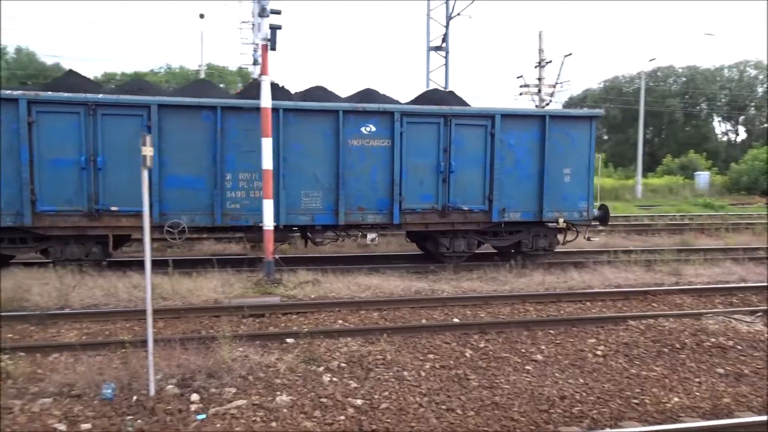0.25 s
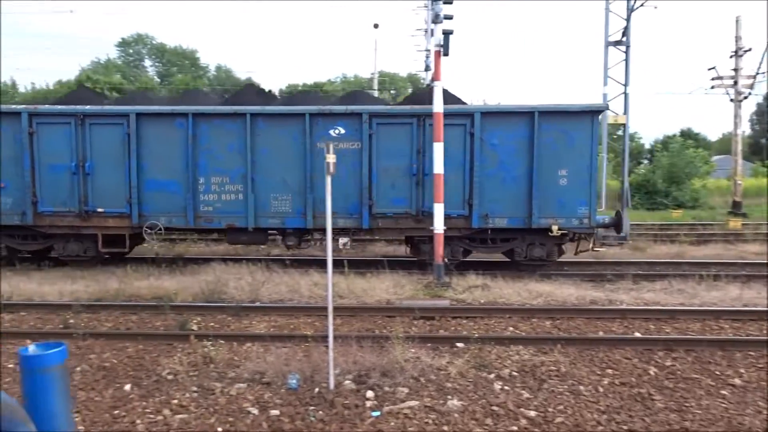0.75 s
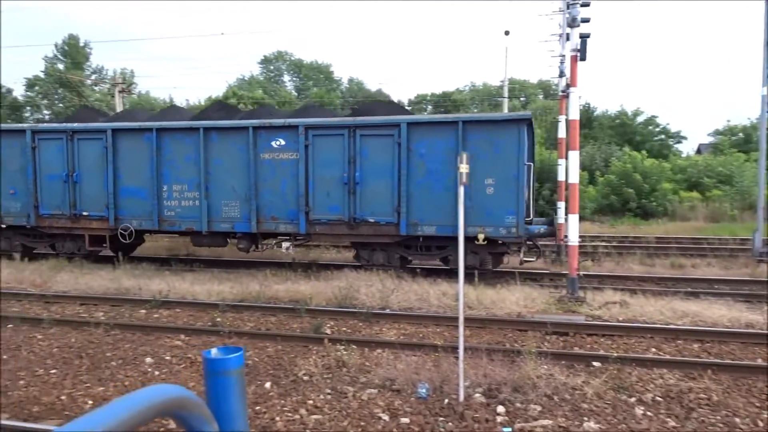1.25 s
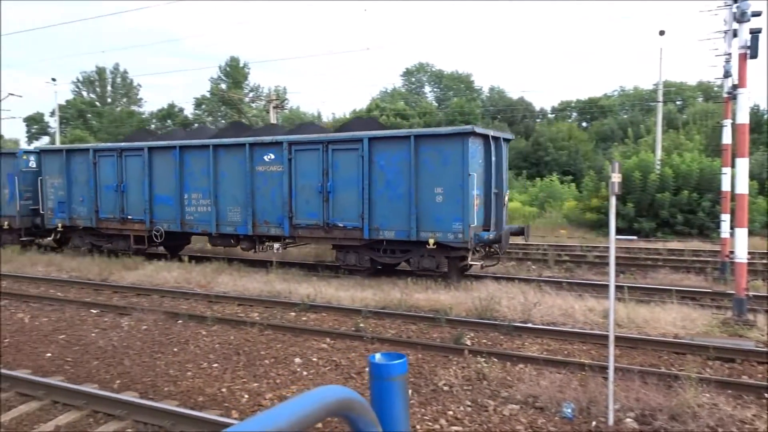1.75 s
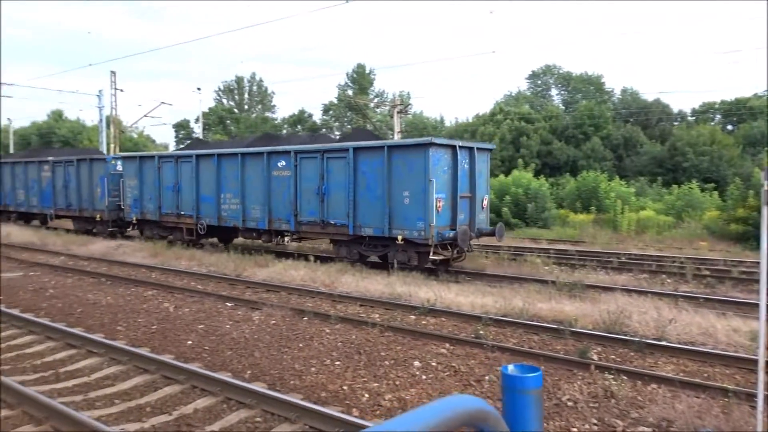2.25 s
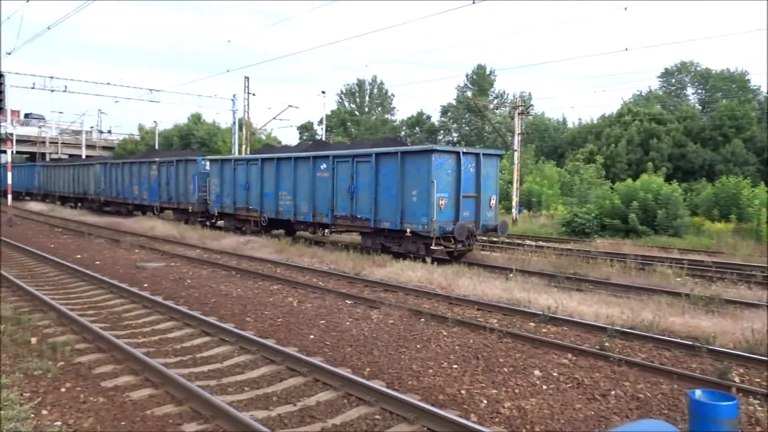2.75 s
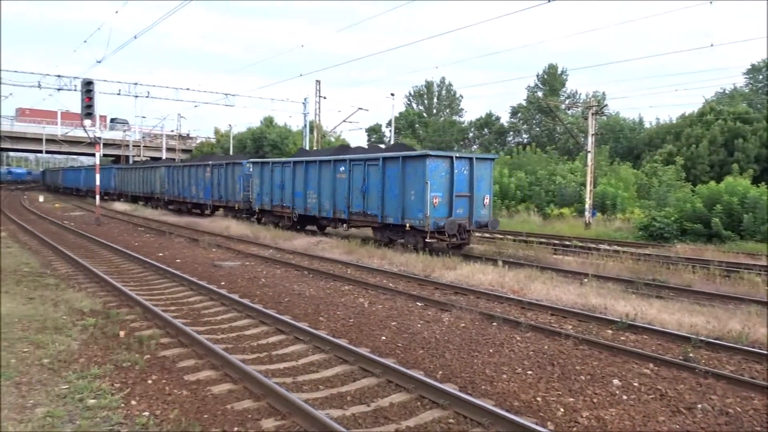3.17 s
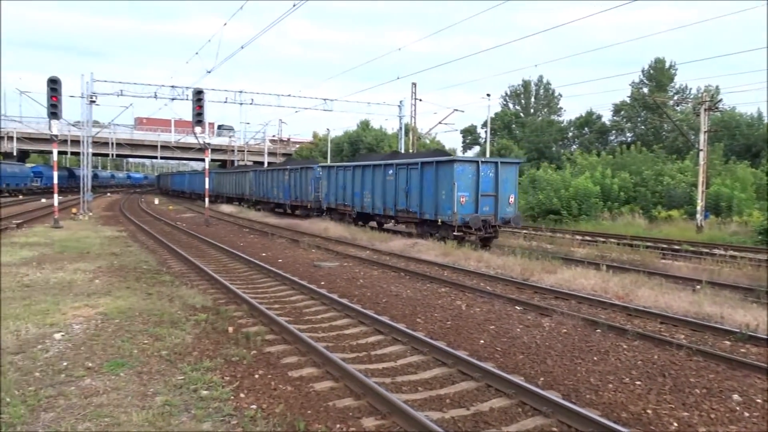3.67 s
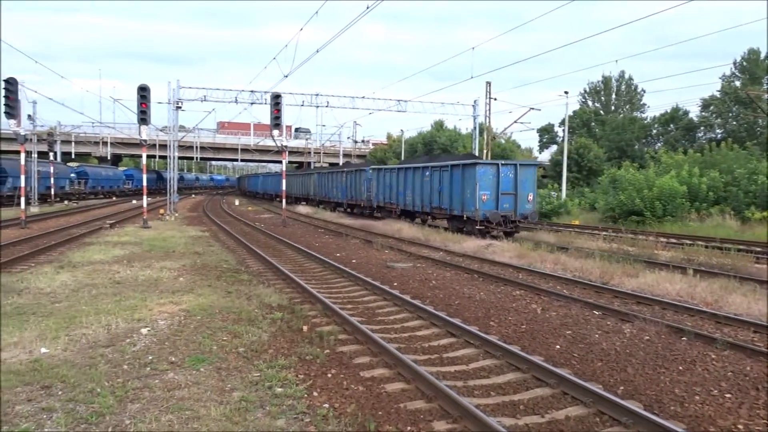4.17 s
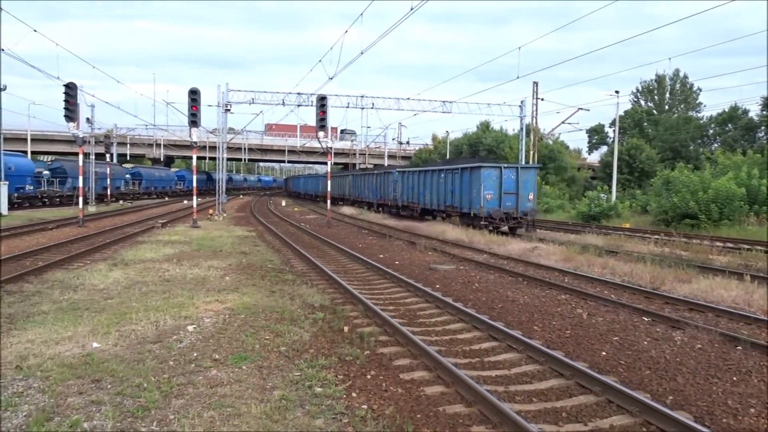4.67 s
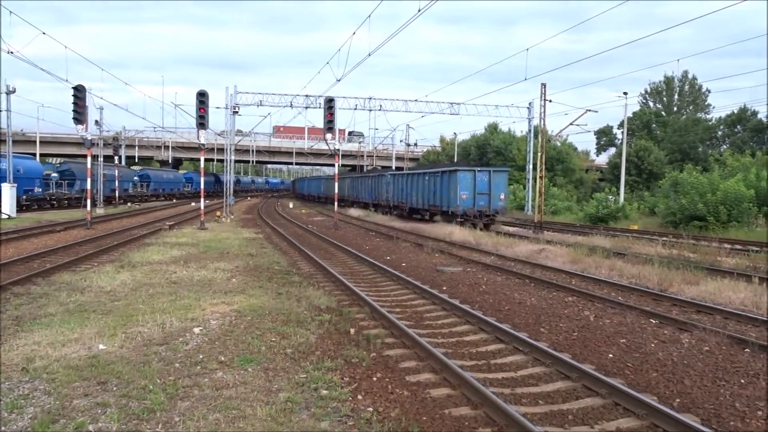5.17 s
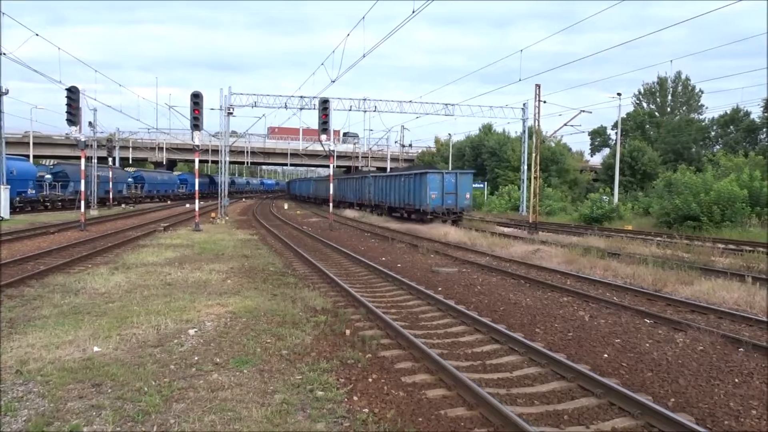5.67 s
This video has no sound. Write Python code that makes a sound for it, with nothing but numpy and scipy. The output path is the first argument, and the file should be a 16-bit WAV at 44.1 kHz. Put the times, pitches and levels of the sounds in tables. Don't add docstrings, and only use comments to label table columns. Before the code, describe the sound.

Loaded steel freight wagons roar and clatter over rail joints in an open yard, knocking and ticking, then recede and thin out.

```python
import sys
import numpy as np
from scipy import signal
from scipy.io import wavfile
from scipy.ndimage import map_coordinates

SR = 44100
rng = np.random.default_rng(int(sys.argv[2]) if len(sys.argv) > 2 else 0)


def boost(x):
    u = np.asarray(x, float) / 20
    return 10 ** u


def master_out(mix):
    frames = np.transpose(np.atleast_2d(mix))
    ceiling = np.clip(frames, -1, 1)
    pcm = np.round(ceiling * 32767).astype(np.int16)
    wavfile.write(sys.argv[1], SR, pcm)


N = 261072

# (t/s, steady rolling level/dB, left minus right/dB)
PASSING = [(0, -17.5, 2.5), (.4, -19.5, 3), (.8, -16, 0), (1.2, -20.5, 1.5), (1.8, -19, 1), (2.4, -18, .6),
           (3, -19.5, -.5), (3.5, -20.5, 0), (4.2, -19, -1.5), (4.7, -22, 0.7), (5.2, -23.5, 0),
           (5.92, -21, 0.5)]
# (t/s, peak level/dB)
TICKS = [(.0164, -32.5), (.2773, -27), (0.52, -23.5), (.6804, -31), (.9218, -22), (.95, -20), (1.1963, -19),
         (1.8966, -23), (2.156, -15), (2.396, -17.5), (2.569, -21), (2.612, -26), (2.812, -23),
         (2.8285, -19), (2.971, -33), (3.0696, -13), (3.5274, -33), (3.59, -20), (3.7684, -19),
         (3.798, -31), (4.0068, -23), (4.023, -12.5), (4.12, -20), (4.2643, -11.5), (4.374, -26),
         (5.0724, -45), (5.5662, -45), (5.8027, -35), (5.865, -37)]
# (t/s, clatter level/dB, hold/s, brightness/dB, first jolt/dB)
AXLES = [(0.042, -15.5, 0.034, 1, 2.5), (0.274, -14, 0.12, -1, -0.5), (0.556, -19, 0.058, 0.5, 4),
         (0.685, -19.5, 0.12, 4, 3), (0.926, -15, 0.18, 2.5, 6), (1.22, -17, 0.13, 1.5, 6.5),
         (1.921, -18, 0.099, 0.5, 7.5), (2.151, -13.5, .12, 2, 3.5), (2.425, -14.5, 0.15, 0.5, 4),
         (2.593, -13, 0.13, 1.5, 4), (2.823, -12, 0.15, 1.5, 3), (2.97, -24, 0.016, 4, 5.5),
         (3.085, -15, 0.13, 2, 4.5), (3.545, -27, 0.073, 7, 0.5), (3.702, -21, 0.12, -3, 1.5),
         (3.788, -11.5, 0.17, 0, 8), (4.022, -11, 0.12, 0.5, 3.5), (4.286, -18, 0.16, 4.5, 6),
         (4.614, -19, 0.16, 0.5, 1), (4.828, -22, .05, -3, -1.5), (5.047, -20, 0.14, 2.5, -0.5),
         (5.304, -20.5, 0.17, 1, 0.5), (5.553, -24, 0.19, 3.5, 3), (5.794, -18.5, 0.14, 3, 1)]
# (f/Hz, left-right likeness 0..1)
LIKENESS = [(60, 0.92), (150, 1), (380, 0.99), (950, 0.99), (2380, 0.76), (5980, 0.58), (15000, 0.42)]
TOP_DB_PER_S = -2.3


def clock():
    return np.arange(N) / SR


def rms_one(x):
    return x / np.sqrt(np.mean(x ** 2) + 1e-20)


def in_time(rows):
    s, *columns = np.transpose(rows)
    return [np.interp(clock(), s, c) for c in columns]


def at_hz(points, hz):
    table_hz, values = np.transpose(points)
    return np.interp(np.log(hz), np.log(table_hz), values)


def drift(rate_hz):
    hop, settle = 40, 2000
    r = np.exp(-2 * np.pi * rate_hz * hop / SR)
    noise = rng.standard_normal(N // hop + settle + 2)
    slow = signal.lfilter([1], [1, -2 * r, r * r], noise)[settle:]
    return np.interp(np.arange(N) / hop, np.arange(len(slow)), rms_one(slow))


def ring(clicks, hz, t60):
    r, w = boost(-60 / (t60 * SR)), 2 * np.pi * hz / SR
    return signal.lfilter([0, np.sin(w)], [1, -2 * r * np.cos(w), r * r], clicks + 1e-18)


def panned(x, db):
    return x * np.array([boost(db / 2), boost(-db / 2)]).reshape(2, -1)


def delayed(x, ms):
    return map_coordinates(x, [np.arange(N) - ms * SR / 1000], order=3, mode="nearest")


def shaking():
    # (attack/s, share of the hold, sag/dB per s, release/dB per s, lift over rolling/dB, share of brightness)
    answer = [
        (0.0084, .3, 37, 96, -5, .1),
        (0.028, 0.84, -2, 123, 0, 0),
        (0.011, 0.8, 21, 104, 1.5, 1.3),
        (0.0073, 0.87, 39, 110, 5.5, 1.63),
    ]
    hop = 32
    t = clock()[::hop]
    s, db, hold, bright = np.transpose(AXLES)[:4, :, None]
    since = np.maximum(t - s, 0)
    rolling_power = boost(2 * in_time(PASSING)[0][::hop])
    levels = []
    for attack, share, sag, release, lift_db, brightens in answer:
        fall_db = sag * since + release * np.maximum(since - share * hold, 0)
        peak_db = db + lift_db + brightens * bright
        clatter = (1 - np.exp(-since / attack)) * boost(peak_db - fall_db)
        power = rolling_power + np.sum(clatter ** 2, axis=0)
        levels.append(np.interp(clock(), t, 10 * np.log10(power)))
    return levels


def jolts(settle_s):
    steps = np.zeros(N)
    for s, *_, jump_db in AXLES:
        steps[round(s * SR)] = jump_db
    return signal.lfilter([1], [1, -np.exp(-1 / (settle_s * SR))], steps)


def rattle(per_s, spread_db, cycles):
    pitches = np.geomspace(280, 7000, 56) * rng.uniform(.99, 1.01, 56)
    sizes = boost(spread_db * np.minimum(rng.exponential(1, (2, N)), 4)) * rng.choice([-1, 1], (2, N))
    clicks = sizes * (rng.random((2, N)) < per_s / SR)
    dealt = rng.integers(0, len(pitches), N)
    return rms_one(sum(ring(clicks * (dealt == k), hz, cycles / hz) * hz for k, hz in enumerate(pitches)))


def wagons(levels, patchy_db, tilt_db):
    # (f/Hz, density/dB per Hz)
    roar = [(60, -57), (120, -17.5), (290, -11), (450, -11), (800, -2), (1300, -0.5), (2500, -3),
            (3400, -6.5), (4400, -8.5), (6000, -13.5), (7500, -19.5), (10000, -25), (13000, -37),
            (16000, -37)]
    # (f/Hz, width/Hz, lift/dB)
    steel_modes = [(294, 46, 5.5), (810, 57, 2.5), (1157, 140, 0.5), (1880, 360, 0.5), (2640, 290, 2.5),
                   (4680, 160, 1.5), (6800, 760, 1), (12300, 590, 0.5)]
    part_hz = [220, 1400, 4500, 10000]
    from_middle_s = clock() - N / SR / 2
    top_db, bass_db = TOP_DB_PER_S * from_middle_s, -1 * from_middle_s
    width_db = 2.5 - 0.3 * clock()
    body = levels[1]
    offsets = [c - body - (c - body).mean() for c in levels]

    share = boost(-20 + 3 * clock() + tilt_db * (body - body.mean()))
    drive = rng.standard_normal((2, 2, N)) + share * rattle(4000, spread_db=3.0, cycles=60)
    drive /= np.sqrt(1 + share ** 2)

    out, together = 0, drift(18)
    edges = 50 * 2 ** np.arange(0, 8.6, 1 / 4)
    for k, (low, high) in enumerate(zip(edges, edges[1:])):
        band = signal.butter(2, [low, high], "band", fs=SR, output="sos")
        mid, side = signal.sosfilt(band, drive[k % 2])
        hz = np.sqrt(low * high)
        alike = at_hz(LIKENESS, hz)
        place = np.interp(np.log(hz), np.log(part_hz), np.arange(4))
        offset = sum(max(0, 1 - abs(place - i)) * c for i, c in enumerate(offsets))
        offset = offset + top_db * np.clip(np.log2(hz / 9000), 0, 1)
        offset = offset + bass_db * np.clip(np.log2(300 / hz), 0, 1)
        offset = offset + 1 * np.exp(-(np.log2(hz / 3300) / 0.32) ** 2)
        flicker_db = patchy_db * (0.3 * together + drift(18.6))
        gain = boost(at_hz(roar, hz) + offset + flicker_db)
        wide = np.sqrt(1 - alike) * boost(width_db) * side * [[1], [-1]]
        out = out + gain * (np.sqrt(1 + alike) * mid + wide)
    for hz, width_hz, db in steel_modes:
        out = out + (boost(db) - 1) * signal.lfilter(*signal.iirpeak(hz, hz / width_hz, fs=SR), out)
    return boost(body + jolts(settle_s=0.027) + 0.5) * rms_one(out)


def chatter(hiss_db):
    per_s, level_db, t60_s = 200, -25, 0.03
    born = (rng.random(N) < per_s / SR) * boost(2.5 * np.minimum(rng.exponential(1, N), 3))
    shape = signal.lfilter([1], [1, -boost(-60 / (t60_s * SR))], born + 1e-18)
    band = signal.butter(2, [3000, 9000], "band", fs=SR, output="sos")
    common, own = signal.sosfilt(band, rng.standard_normal((2, N)))
    return boost(level_db + hiss_db) * rms_one(shape * (common + .6 * own * [[1], [-1]]))


def noise_floor():
    white = rng.standard_normal((3, N))
    low = signal.sosfilt(signal.butter(2, [20, 90], "band", fs=SR, output="sos"), white[:2])
    hiss = signal.sosfilt(signal.butter(2, [9000, 16500], "band", fs=SR, output="sos"), white[2])
    rumble = boost(-53) * rms_one(low[0] + 0.16 * low[1] * [[1], [-1]])
    fading = boost(1.5 * TOP_DB_PER_S * (clock() - N / SR / 2))
    return rumble + boost(-57.5) * fading * rms_one(hiss)


def ticks(tail_db, tail_s):
    hz, t60_s, rise_s = 11000, 0.075, 0.0007
    out, t = np.zeros((2, N)), np.arange(SR // 4) / SR
    band = signal.butter(2, [hz * 0.41, hz * 1.1], "band", fs=SR, output="sos")
    shape = (1 - np.exp(-t / rise_s)) * (boost(-60 * t / t60_s) + boost(tail_db - 60 * t / tail_s))
    for s, db in TICKS:
        pan_db = -12 + 4 * min(s, 4.2)
        common, left, right = signal.sosfilt(band, rng.standard_normal((3, len(t))))
        burst = panned(common + 0.86 * np.array([left, right]), pan_db) * shape * boost(db + 2)
        i = round(s * SR)
        out[:, i:i + len(t)] += burst[:, :N - i]
    return out


def rail_rings():
    # (f/Hz, level against the tick/dB)
    rail_modes = [
        (6400, -19),
        (9500, -23),
        (12300, -18),
    ]
    hold_s = 0.027
    luck_db = rng.normal(0, 2.1, (len(TICKS), len(rail_modes)))
    events = []
    for (s, db), row in zip(TICKS, luck_db):
        for (hz, mode_db), own_db in zip(rail_modes, row):
            events.append((s, db + mode_db + own_db, hz, hold_s))
    return events


def thuds():
    level_db, rise_s, t60_s = -5, 0.0088, 0.14
    out, t = np.zeros(N + SR), np.arange(SR // 5) / SR
    band = signal.butter(2, [200, 750], "band", fs=SR, output="sos")
    shape = (1 - np.exp(-t / rise_s)) * boost(-60 * t / t60_s)
    for s, db, *_ in AXLES:
        burst = rms_one(signal.sosfilt(band, rng.standard_normal(len(t))))
        i = round(s * SR)
        out[i:i + len(t)] += boost(db + level_db) * shape * burst
    return out[:N]


def rings(sharpness, fade):
    # (t/s, rms level/dB, f/Hz, length/s)
    scraped = [(.298, -17.5, 2780, 0.047), (.679, -24, 2600, .06), (.681, -25, 760, 0.079),
               (3.53, -37, 12400, 0.081), (.719, -11, 1883, 0.011), (.934, -21, 1310, .047),
               (1.23, -23, 1440, 0.075), (1.244, -15, 2370, 0.034), (2.209, -16.5, 1120, 0.029),
               (2.295, -23, 1110, .041), (2.421, -12, 2780, 0.022), (2.442, -21, 4370, .05),
               (2.608, -17.5, 2570, 0.05), (2.63, -19.5, 1830, 0.063), (2.846, -31, 4400, 0.024),
               (2.884, -14.5, 1844, 0.035), (3.095, -18, 2515, 0.031), (3.122, -18, 1860, 0.041),
               (3.793, -19.5, 1880, 0.062), (3.8, -20.5, 1100, 0.08), (3.823, -22, 2500, 0.05),
               (3.836, -21.5, 3570, 0.022), (4.024, -20, 664, .017), (4.086, -14.5, 1850, 0.03),
               (4.268, -16, 920, .012), (4.29, -14, 2410, 0.012), (4.307, -21, 1276, .027),
               (4.342, -15.5, 1825, .033), (4.37, -23, 6600, 0.013), (5.82, -35, 4300, 0.063)]
    settle = 2000
    out, t = np.zeros((2, N)), np.arange(SR // 5) / SR
    for s, db, hz, length in scraped + rail_rings():
        peak = signal.iirpeak(hz, sharpness * np.sqrt(hz / 1000), fs=SR)
        once = signal.lfilter(*peak, rng.standard_normal((2, len(t) + settle)))
        common, own = signal.lfilter(*peak, once)[:, settle:]
        alike = at_hz(LIKENESS, hz)
        tone = rms_one(np.sqrt(1 + alike) * common + np.sqrt(1 - alike) * own * [[1], [-1]])
        fall = np.exp(-np.maximum(t - length, 0) / (fade * length + 0.0036))
        shape = (1 - np.exp(-t / 0.0029)) * fall
        i = round(s * SR)
        out[:, i:i + len(t)] += (boost(db) * tone * shape)[:, :N - i]
    return out


def knocks():
    # (t/s, peak level/dB, ring f/Hz, t60/s)
    blows = [(0.552, -7, 510, 0.04), (0.683, -3.5, 820, 0.1), (0.801, -9, 1380, 0.088),
             (0.928, -13, 1310, 0.083), (1.059, -4, 934, 0.09), (1.224, -14, 1380, 0.079),
             (0.936, -5.5, 643, 0.1), (1.929, -12, 303, 0.26), (2.163, -8.5, 1100, 0.31),
             (2.428, -8.5, 610, 0.021), (2.835, -9, 793, 0.25), (3.097, -9, 1287, 0.14),
             (3.501, -9.5, 807, 0.29), (3.808, -22, 1130, 0.13), (4.007, -1.5, 827, 0.11),
             (4.035, -4, 614, 0.036), (4.272, 1, 990, 0.066), (4.296, -11, 618, 0.052),
             (5.124, -23, 1500, 0.09)]
    out, t = np.zeros(N), np.arange(SR // 3) / SR
    body = signal.butter(2, [350, 1600], "band", fs=SR, output="sos")
    for s, db, hz, t60 in blows:
        scrape = rng.standard_normal(len(t)) * np.exp(-t / (0.098 * t60))
        pair = ring(scrape, hz, t60) + 0.72 * ring(scrape, hz * 1.08, t60)
        crack = signal.sosfilt(body, scrape)
        sound = pair / np.abs(pair).max() + 0.31 * crack / np.abs(crack).max()
        i = round(s * SR)
        out[i:i + len(t)] += boost(db - 5.5) * sound[:N - i]
    return signal.sosfilt(signal.butter(2, 260, "high", fs=SR, output="sos"), out)


def reflected(x):
    delay_ms = 1.635
    strength = 0.35 * (1 - np.exp(-clock() / 1.5))
    pan_db = in_time(PASSING)[1]
    dull = signal.sosfilt(signal.butter(1, [350, 4000], "band", fs=SR, output="sos"), x.mean(axis=0))
    return panned((x + strength * delayed(dull, delay_ms)) / np.sqrt(1 + strength ** 2), pan_db)


def ports(sound, lag_ms):
    return np.array([sound[0], delayed(sound[1], lag_ms)])


def scene():
    levels = shaking()
    steel = wagons(levels, patchy_db=1.24, tilt_db=0.5) + chatter(levels[-1])
    steel = steel + thuds() + rings(sharpness=6.8, fade=0.47) + knocks()
    swing_ms = 0.071 * np.exp(-clock() / 2.5)
    through_air = ports(reflected(steel), swing_ms)
    along_rail = ports(ticks(tail_db=-21, tail_s=0.48), lag_ms=0.059)
    return through_air + along_rail + noise_floor()


def top_cut(x):
    return signal.sosfilt(signal.butter(12, 15720, fs=SR, output="sos"), x)


def record(dry):
    x = signal.sosfilt(signal.butter(2, 110, "high", fs=SR, output="sos"), dry)
    x = 1.275 * np.tanh(x / 1.32)
    x = signal.sosfilt(signal.cheby2(12, 70, 16100, fs=SR, output="sos"), x)
    return top_cut(np.clip(x, -1, 1))


dry = scene()
out = record(dry)
master_out(out)
```